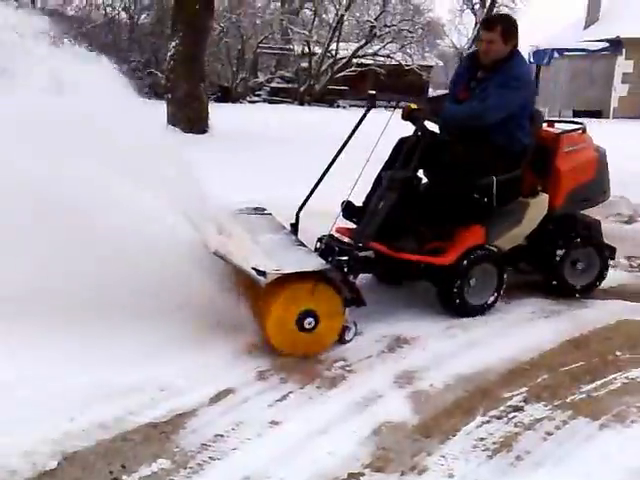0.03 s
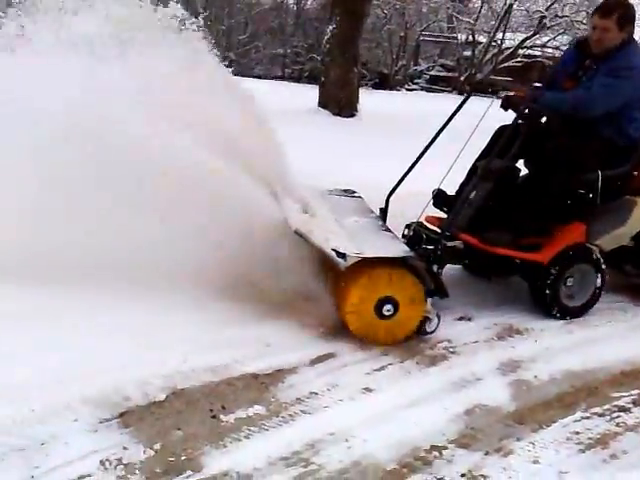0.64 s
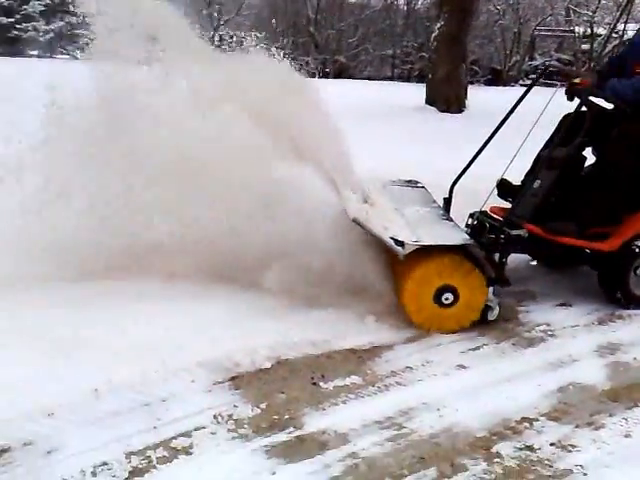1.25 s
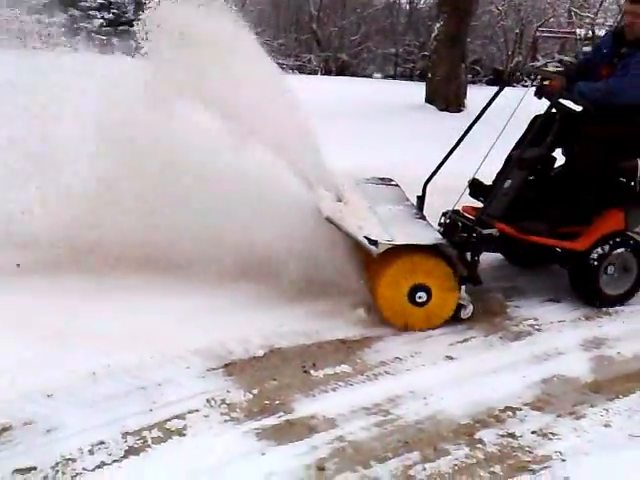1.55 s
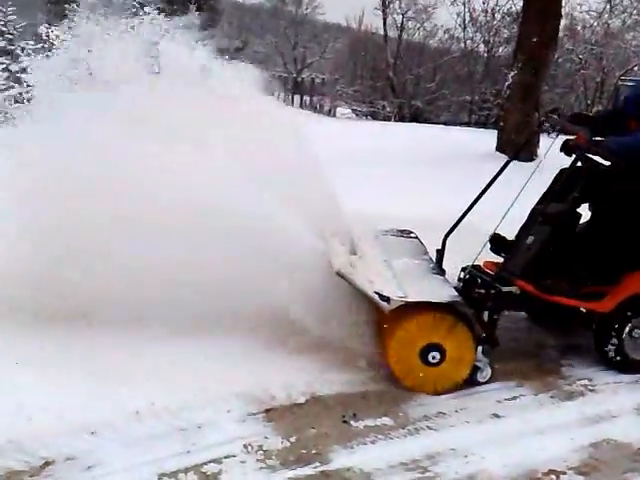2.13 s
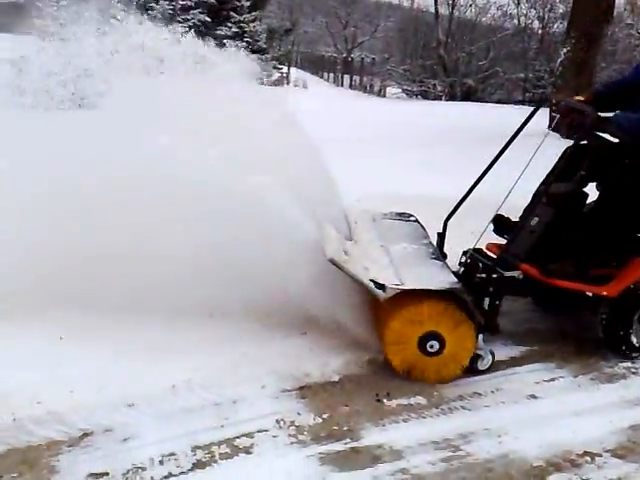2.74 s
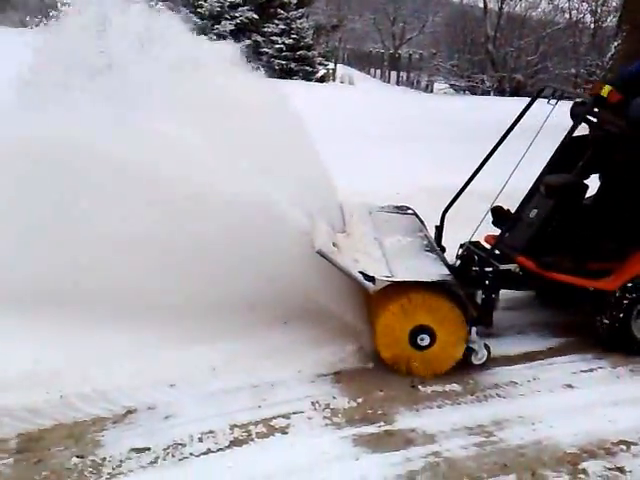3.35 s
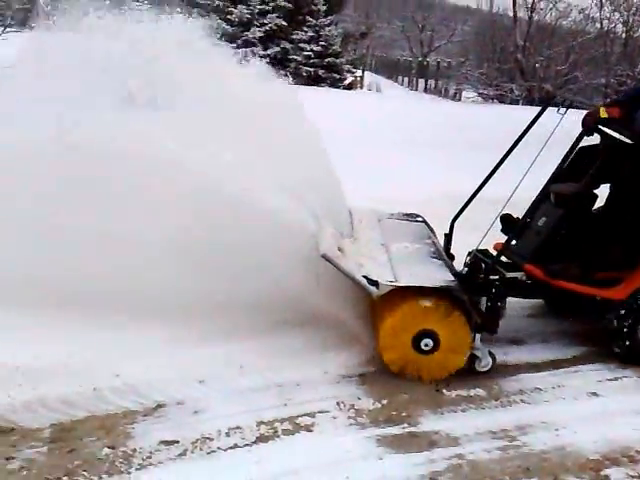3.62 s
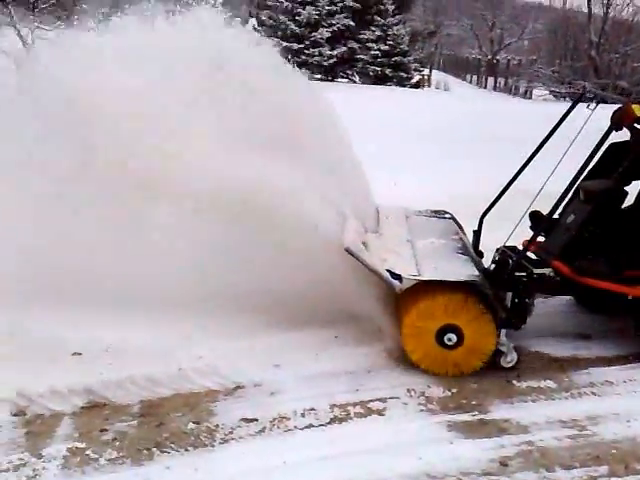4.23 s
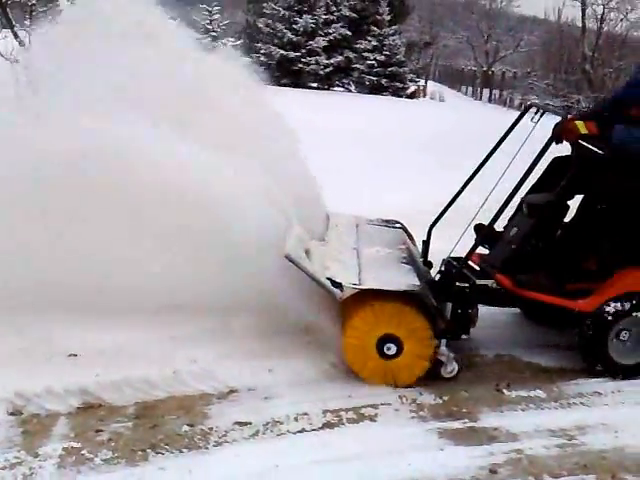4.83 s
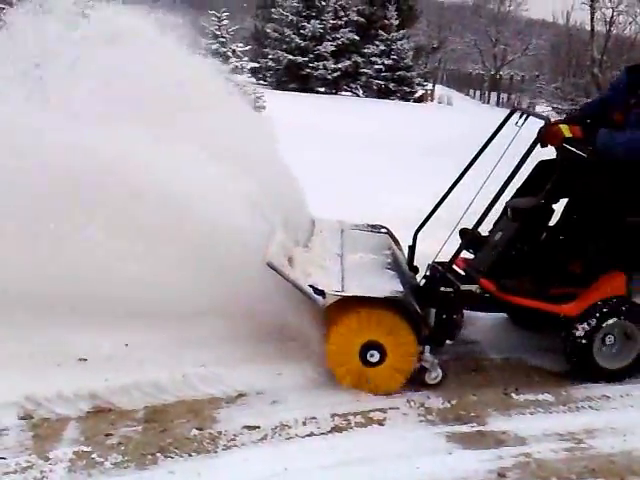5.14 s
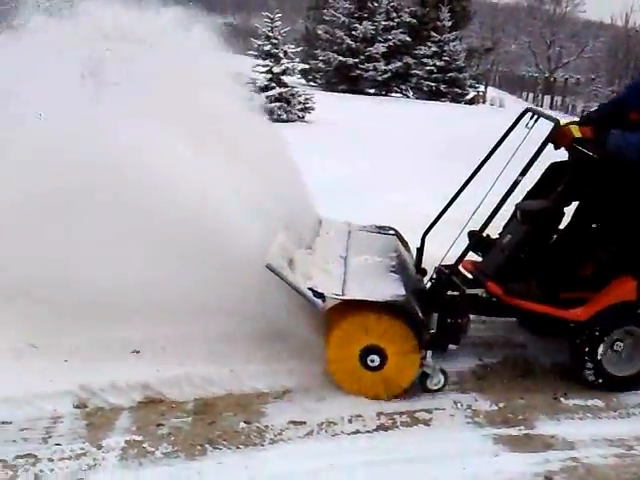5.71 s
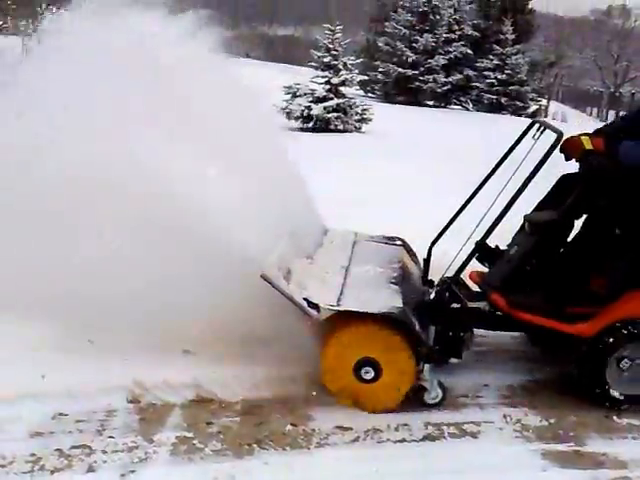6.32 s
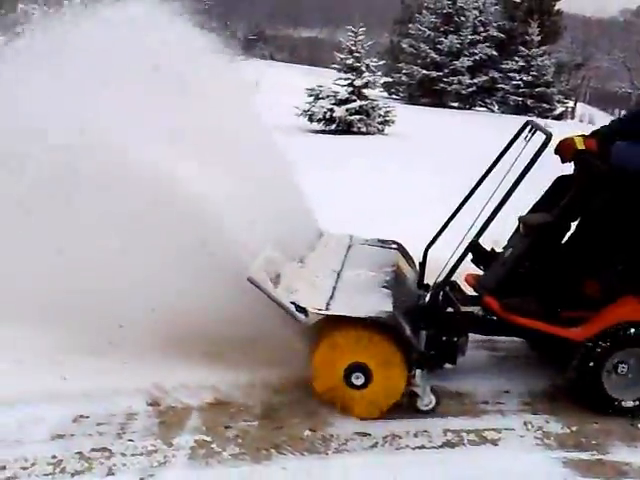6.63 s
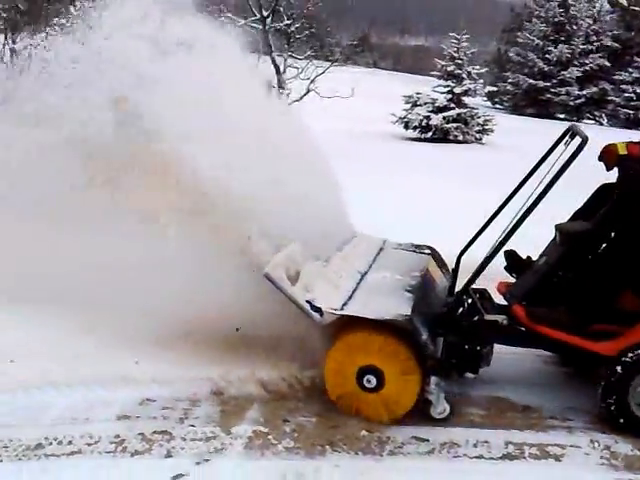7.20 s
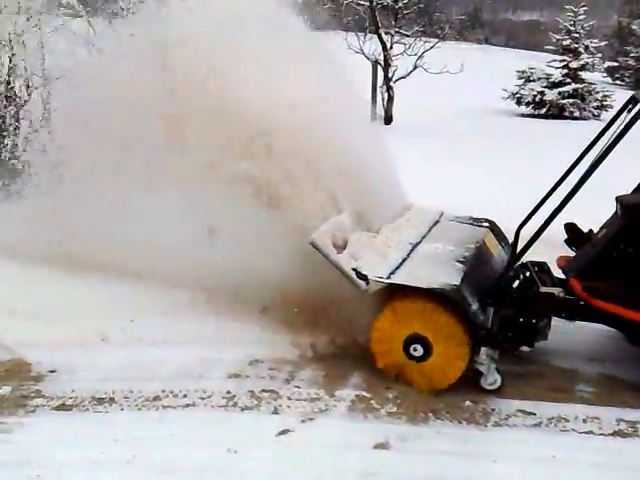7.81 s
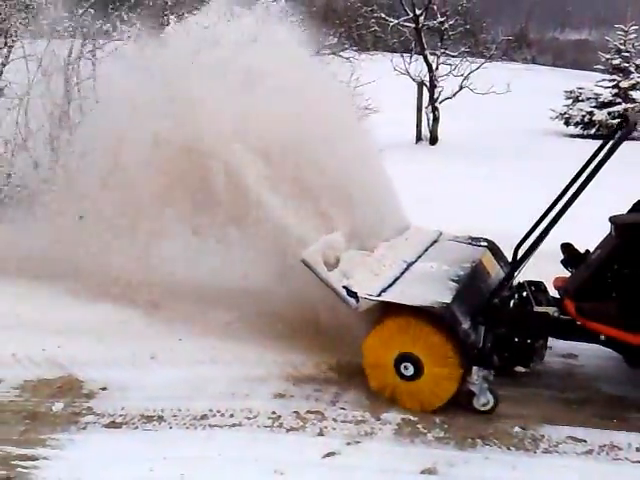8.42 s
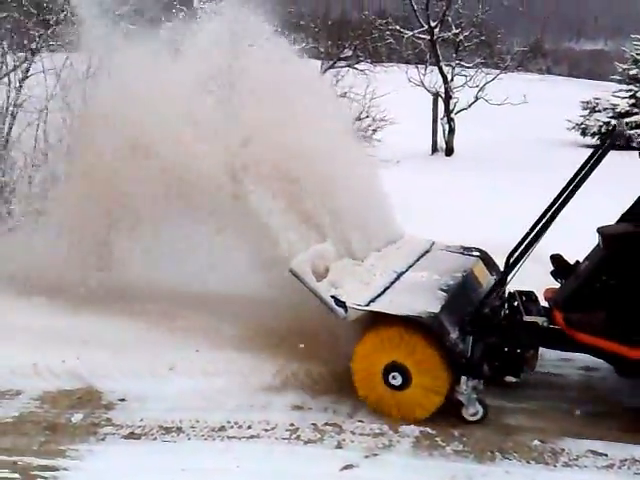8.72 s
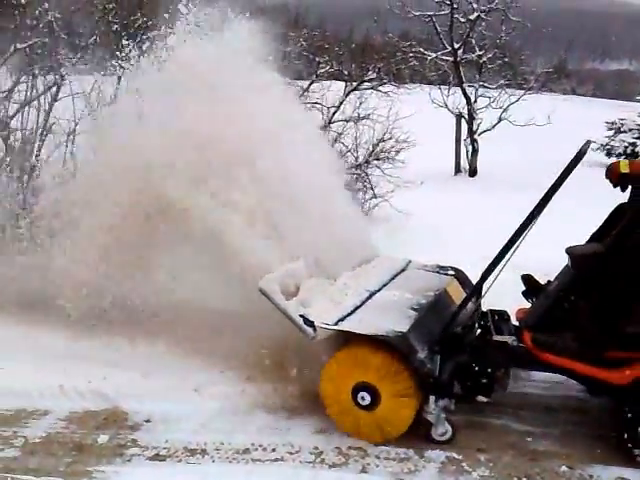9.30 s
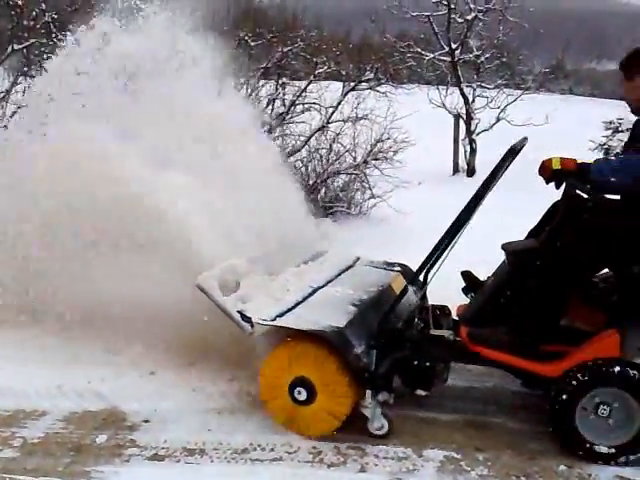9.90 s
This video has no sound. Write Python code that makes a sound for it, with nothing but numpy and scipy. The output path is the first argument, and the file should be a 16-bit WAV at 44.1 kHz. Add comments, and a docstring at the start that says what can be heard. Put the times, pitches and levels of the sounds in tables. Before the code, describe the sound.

Loud, steady small engine drone with a wavering whine, under the swelling scrape and hiss of a rotary brush clearing snow.

```python
"""A ride-on sweeper at full throttle, clearing a snowy drive with a rotary brush as it passes the microphone.
Its V-twin fires unevenly and hunts slowly on the governor; fan and drive whine over the mechanical roar.
The lopsided brush scrapes the pavement in a swell on every turn and throws a hissing spray of snow.
One position in the open, in mono: the machine is heard first from ahead, then from alongside."""
import sys
import numpy as np
from scipy import signal
from scipy.fft import rfft, irfft, next_fast_len
from scipy.io import wavfile
from scipy.ndimage import uniform_filter1d, map_coordinates

SR = 44100
rng = np.random.default_rng(int(sys.argv[2]) if len(sys.argv) > 2 else 0)


def dump(signal):
    """Clip the signal to [-1, 1] and save it as 16-bit WAV at the path in sys.argv[1]."""
    limited = np.clip(np.atleast_2d(signal).T, -1, 1)
    pcm = np.round(limited * 32767).astype(np.int16)
    wavfile.write(sys.argv[1], SR, pcm)


N = 438794


def from_db(db):
    """Decibels to gain."""
    return 10 ** (np.asarray(db) / 20)


def rms_one(x):
    """Scale to unit power."""
    return x / np.sqrt(np.mean(x ** 2) + 1e-20)


def in_time(rows):
    """Each column of a table over t/s, sample by sample."""
    times, *columns = np.transpose(rows)
    return [np.interp(np.arange(N) / SR, times, column) for column in columns]


def drift(rate_hz):
    """A smooth random wander of spread 1, mostly slower than rate_hz."""
    hop, settle = 40, 2000
    pole = np.exp(-2 * np.pi * rate_hz * hop / SR)
    white = rng.standard_normal(N // hop + settle + 2)
    slow = signal.lfilter([1], [1, -2 * pole, pole * pole], white)[settle:]
    return np.interp(np.arange(N) / hop, np.arange(len(slow)), rms_one(slow))


def filtered(x, response):
    """Pass x through a frequency response, given as a function of Hz."""
    size = next_fast_len(N + SR // 10)
    hz = np.maximum(np.arange(size // 2 + 1) * SR / size, 1)
    return irfft(rfft(x, size) * response(hz), size)[:N]


def coloured(white, spectrum):
    """Give a white excitation of unit power a spectrum in dB per Hz."""
    points_hz, db = np.transpose(spectrum)
    shaped = filtered(white, lambda hz: from_db(np.interp(np.log(hz), np.log(points_hz), db)))
    return np.sqrt(SR / 2) * shaped


def turning(white, ahead, alongside, aspect):
    """The colour of a source changes as it turns its side to the microphone."""
    return (1 - aspect) * coloured(white, ahead) + aspect * coloured(white, alongside)


def grains(per_s, spread_db):
    """Tiny impacts of uneven size at random moments; unit power."""
    sizes = from_db(spread_db * np.minimum(rng.exponential(1, N), 4)) * rng.choice([-1, 1], N)
    hits = rng.random(N) < per_s / SR
    return rms_one(sizes * hits / np.sqrt(per_s))


def echo(x, delay_s):
    """x as it reaches the microphone over a longer path whose length changes."""
    return map_coordinates(x, [np.arange(N) - delay_s * SR], order=3)


# The two cylinders, firing 270 degrees apart: place/cycles, level/dB
FIRINGS = [(.128, 0), (.502, -8)]
# Exhaust note behind the muffler: order (multiple of the cycle rate), level/dB
EXHAUST_ORDERS = [(1, -50.0), (2, -32), (3, -35.0), (4, -39.5), (5, -23.5), (6, -30.5), (7, -32.5),
                  (8, -27.5), (9, -40.5), (10, -40), (11, -39), (12, -48), (13, -56)]
# The exhaust as it passes the microphone: t/s, boom gain/dB, bark gain/dB
EXHAUST_PASS = [(0, .2, 0.3), (1.5, -1, 0.7), (2.7, 1, -0.3), (3.5, -0.8, -.5), (4.6, -1.4, -0.5),
                (6.6, 1, 0.8), (8.3, -1, -0.5), (9.95, 2, -3.5)]


def exhaust(cycle, speed, uneven_db=0.1, jitter_cycles=0.0022, bark_from_order=7, throttle_s=0.43):
    """The muffler keeps the low orders of two puffs and an intake gulp a cycle; throttle adds bark."""
    boom_db, bark_db = in_time(EXHAUST_PASS)
    pickup = uniform_filter1d(np.gradient(speed) * SR, int(throttle_s * SR))
    bark_db = bark_db + 0.66 * pickup   # the throttle is open while the engine gains speed
    cycle = cycle + jitter_cycles * drift(5.3)
    gulp_place, gulp_db = .78, -6
    boom, bark = np.zeros((2, N))
    for order, db in EXHAUST_ORDERS:
        # the pulses set the phase: a puff swings from suction to pressure, the gulp is a single hump
        puffs = sum(-1j * from_db(puff_db) * np.exp(-2j * np.pi * order * place)
                    for place, puff_db in FIRINGS)
        gulp = from_db(gulp_db) * np.exp(-2j * np.pi * order * gulp_place)
        partial = np.sqrt(2) * from_db(db) * np.cos(2 * np.pi * order * cycle + np.angle(puffs + gulp))
        if order < bark_from_order:
            boom += partial
        else:
            bark += partial
    return (from_db(boom_db) * boom + from_db(bark_db) * bark) * from_db(uneven_db * drift(24))


def belt_tone(cycle, order, db, slip_periods=0.098, surge_cycles=0.00085):
    """A tone that follows the engine; the belts slip a little and the crank's surge roughens it."""
    surging = cycle + surge_cycles * np.sin(2 * np.pi * cycle)
    phase = order * surging + rng.random() + slip_periods * drift(4.8)
    return np.sqrt(2) * from_db(db) * np.sin(2 * np.pi * phase)


# Belts, gears and engine casing: order, level/dB
DRIVE_ORDERS = [(7.45, -39.5), (17, -47), (18, -45.5), (21.4, -39), (23, -47), (30, -42), (37, -52),
                (42, -46.5), (52, -54), (72, -44), (90.3, -46.5)]


def drive_whine(cycle, gain_db=-1.5, waver_db=2.2):
    """The turning parts of the drive whine, each tone wavering on its own."""
    return sum(belt_tone(cycle, order, db + gain_db + waver_db * drift(2.9))
               for order, db in DRIVE_ORDERS)


# Cooling fan from two microphone angles: order, level ahead/dB, level alongside/dB
FAN_ORDERS = [(24, -47, -44), (36, -41.5, -38.5), (46, -42, -57), (48, -48.5, -50), (54, -50, -39)]
# Cowl resonances, beamed forward along the drive: f/Hz, half width/Hz, lift/dB
COWL_RESONANCES = [(916, 19, 10.5), (1302, 37, 21.5), (1370, 22, 15.5)]


def fan_whine(cycle, speed, aspect, gain_db=-1.5, flutter_db=2.0):
    """The fan's air flutters, and a tone sings out as it glides through a resonance of the cowl."""
    fan = np.zeros(N)
    for order, ahead_db, alongside_db in FAN_ORDERS:
        cowl_db = sum(lift_db / (1 + ((order * speed - hz) / half_width) ** 2)
                      for hz, half_width, lift_db in COWL_RESONANCES)
        db = (1 - aspect) * (ahead_db + cowl_db) + aspect * alongside_db
        fan += belt_tone(cycle, order, db + gain_db + flutter_db * drift(10))
    return fan


def chatter(cycle, knock=0.27, knock_cycles=.07, repeating_share=.1):
    """Dense mechanical noise that jumps at each firing; part of it repeats on every turn of the crank."""
    blows = sum(from_db(db) * np.exp(-((cycle - place + knock_cycles) % 1) / knock_cycles)
                for place, db in FIRINGS)
    one_turn = rng.standard_normal(round(N / (2 * cycle[-1])))
    repeating = np.interp(2 * cycle % 1, np.linspace(0, 1, len(one_turn)), one_turn)
    noise = np.sqrt(1 - repeating_share) * rng.standard_normal(N) + np.sqrt(repeating_share) * repeating
    return rms_one(noise * (1 + knock * blows))


# Engine roar with the microphone ahead, then alongside: f/Hz, level/dB
ROAR_FRONT = [(25, -66), (90, -63.5), (200, -55.5), (290, -62), (380, -62.5), (560, -55.5), (710, -60),
              (940, -57.5), (1160, -61.5), (1380, -56), (1700, -60.5), (2250, -59), (4200, -78),
              (16000, -79)]
ROAR_SIDE = [(25, -73), (90, -61.5), (200, -54), (310, -57), (410, -63.5), (590, -55), (760, -60.5),
             (1000, -56), (1270, -61.5), (1480, -57), (1750, -61.5), (2350, -61.5), (4200, -76),
             (16000, -88)]


def engine_roar(cycle, aspect):
    """The engine's chatter as a broad roar, coloured by the side that faces the microphone."""
    return turning(chatter(cycle), ROAR_FRONT, ROAR_SIDE, aspect)


# Thin sheet metal of the deck: f/Hz, width/Hz, level/dB
DECK_MODES = [(1524, 78, -64), (1920, 180, -57), (2650, 550, -66), (3340, 340, -64.5), (3910, 360, -69)]


def deck_rattle(cycle):
    """The engine shakes the deck, which rings in its broad modes."""
    def modes(hz):
        return sum((-1) ** i * from_db(db) / (1 + 1j * (hz ** 2 - mode_hz ** 2) / (hz * width))
                   for i, (mode_hz, width, db) in enumerate(DECK_MODES))
    return np.sqrt(SR / 2) * filtered(chatter(cycle), modes)


# Bristle tips and flung snow with the microphone ahead, then alongside: f/Hz, level/dB
SPRAY_FRONT = [(1500, -103), (3500, -70), (4300, -64), (5100, -59), (6050, -56), (6900, -61), (8000, -57.5),
               (9200, -61.5), (10300, -59.5), (11800, -57), (13500, -60.5), (15700, -65.5)]
SPRAY_SIDE = [(1500, -76), (4200, -65.5), (5250, -60), (5700, -56.5), (6400, -56), (7150, -61), (7900, -58),
              (8900, -60.5), (9450, -62.5), (10000, -56.5), (11600, -58.5), (13800, -60.5), (15700, -64.5)]
# First dip cut by the hood's reflection, moving with the angle to the microphone: t/s, f/Hz
HOOD_NOTCH = [(0, 3450), (1.1, 3530), (2.0, 4200), (2.8, 4400), (3.8, 4860), (5.5, 5000), (7.0, 4240),
              (8.4, 4900), (9.95, 4400)]
# Extra distance to the microphone by way of the packed ground, as a lag: t/s, delay/ms
GROUND_DELAY = [(0, 1.45), (3, 1.4), (6, 1.8), (9.95, 2.1)]


def snow_spray(press_db, aspect, gain_db=-0.39, crystals_per_s=22000):
    """More pressure throws more and louder grains; hood and ground echoes make the hiss a bit hollow."""
    crystals = grains(crystals_per_s * from_db(press_db / 2), spread_db=2.0)
    spray = from_db(gain_db + press_db) * turning(crystals, SPRAY_FRONT, SPRAY_SIDE, aspect)
    off_hood = echo(spray, 1 / in_time(HOOD_NOTCH)[0])
    off_ground = echo(spray, in_time(GROUND_DELAY)[0] / 1000)
    return spray - .17 * off_hood + .13 * off_ground


# Bristles on the pavement, under the hood: f/Hz, level/dB
SCRAPE_SPECTRUM = [(500, -78), (1250, -69), (1600, -54.5), (2050, -55), (2350, -51), (2700, -54.5),
                   (3300, -62.5), (4200, -68), (7000, -80)]


def bristle_scrape(bite_db, quick_db, aspect, gain_db=-3.5, side_db=3.5, flicks_per_s=7000):
    """Flicking bristles follow the pressure only in part, and are more open to a microphone alongside."""
    level_db = gain_db + 0.77 * bite_db + 0.55 * quick_db + side_db * aspect
    return from_db(level_db) * coloured(grains(flicks_per_s, spread_db=3.0), SCRAPE_SPECTRUM)


# How hard the brush bites on its way along the drive: t/s, level/dB
BRUSH_BITE = [(0.0, -8.2), (0.11, -11), (0.96, -1.5), (1.6, -10), (2.69, -9.5), (3.01, -2), (4.33, -0.1),
              (4.4, -5), (4.62, -5.5), (4.87, -11.5), (5.36, -12.5), (5.97, -10.5), (6.26, -5.9),
              (6.41, -12.6), (6.54, -6), (7.2, 0.2), (8.85, -0.2), (9.22, -1.5), (9.36, -4), (9.95, -7.5)]
# Swell on every turn of the brush: t/s, depth/dB
BRUSH_SWELL = [(0.0, 1.9), (1.0, 2), (2.3, 3.5), (3.2, 2.2), (4.6, 2), (5.1, 0.7), (6.2, 1.2), (6.6, 2.5),
               (7.9, 0.7), (9.95, 1.8)]
# Uneven ground makes the brush hop clear (-) or dig in (+): t/s, half length/s, pressure change/dB
GROUND_JOLTS = [(3.797, 0.053, -5.5), (5.64, 0.026, 4), (6.102, 0.047, 2.5), (7.382, 0.067, -8.5),
                (7.481, 0.032, -8.5), (7.59, 0.033, 1)]


def brush(cycle, aspect, turns_per_cycle=.2555, lopsided=0.3, lag_turns=.068, clump_db=0.54):
    """The long side of the brush digs in once a turn; its pressure drives both spray and scrape."""
    (bite_db,), (depth_db,) = in_time(BRUSH_BITE), in_time(BRUSH_SWELL)
    turn = turns_per_cycle * cycle + .045
    swell_db = depth_db * (np.cos(2 * np.pi * turn) + lopsided * np.cos(4 * np.pi * (turn - lag_turns)))
    t = np.arange(N) / SR
    jolts_db = sum(db * np.exp(-((t - at_s) / half_s) ** 2) for at_s, half_s, db in GROUND_JOLTS)
    quick_db = swell_db + jolts_db + clump_db * drift(45)
    return snow_spray(bite_db + quick_db, aspect) + bristle_scrape(bite_db, quick_db, aspect)


# The engine hunting on its governor, in four-stroke cycles a second: t/s, f/Hz
CYCLE_RATE = [(0.0, 26.93), (0.598, 25.34), (1.408, 26.578), (1.802, 27.316), (1.976, 26.684),
              (2.75, 25.724), (3.236, 27.002), (4.028, 25.723), (4.428, 26.175), (4.868, 27.087),
              (5.406, 26.284), (6.173, 26.202), (6.672, 27.168), (7.321, 25.189), (7.635, 26.688),
              (8.057, 25.919), (8.873, 25.973), (9.366, 26.88), (9.95, 26.874)]
# Where the microphone stands to the machine: t/s, aspect (0 ahead, 1 alongside)
MIC_ASPECT = [(0, .03), (2, 0.13), (3.2, .25), (4.1, 0.54), (4.9, 0.27), (5.8, 0.24), (6.9, 1),
              (9.95, 0.91)]
# Mechanical noise at the microphone: t/s, roar gain/dB, deck rattle gain/dB
CHATTER_PASS = [(0, 0.1, -8), (3.2, 0.5, -4), (4.1, -1.9, -6), (4.7, 0.5, 0.5), (6.3, 1.5, 3.5),
                (6.9, 0, -1.5), (8.8, -0.2, -1), (9.95, 1.5, 3.5)]


def scene():
    """The sweeper passes one microphone in the open; snow swallows the far echoes. Both channels alike."""
    (speed,), (roar_db, rattle_db) = in_time(CYCLE_RATE), in_time(CHATTER_PASS)
    cycle = np.cumsum(speed) / SR
    aspect = np.clip(in_time(MIC_ASPECT)[0], 0, 1)
    roar = from_db(roar_db) * engine_roar(cycle, aspect)
    tones = exhaust(cycle, speed) + drive_whine(cycle) + fan_whine(cycle, speed, aspect)
    rattle = from_db(rattle_db) * deck_rattle(cycle)
    return np.tile(tones + roar + rattle + brush(cycle, aspect), (2, 1))


def record(dry, cutoff_hz=15700):
    """A steep low-pass after the microphone takes off the very top."""
    return signal.sosfilt(signal.ellip(12, .1, 90, cutoff_hz, fs=SR, output="sos"), dry)


dry = scene()
out = record(dry)
dump(out)
```